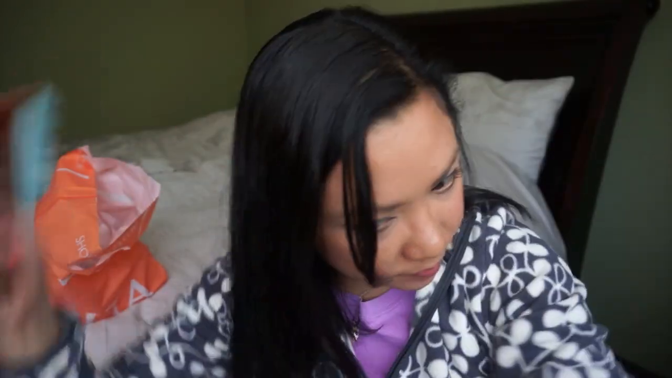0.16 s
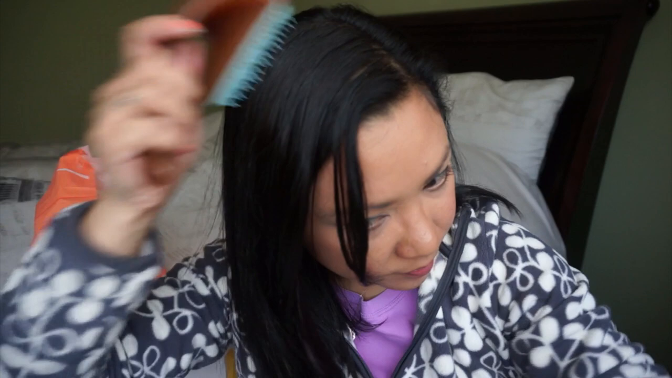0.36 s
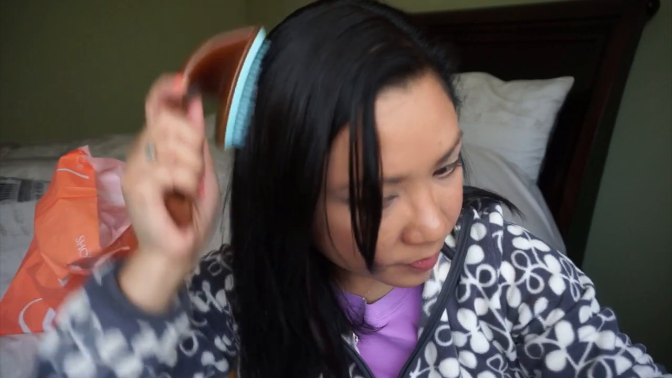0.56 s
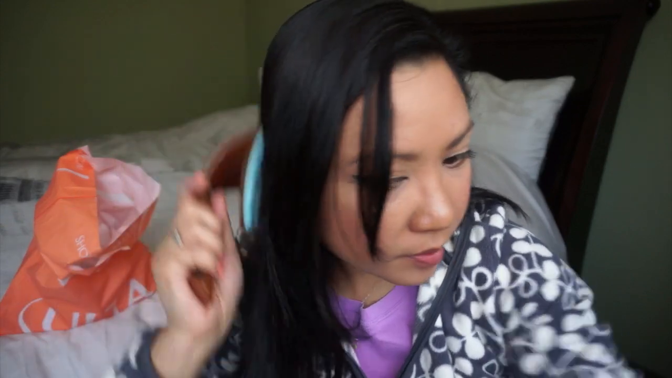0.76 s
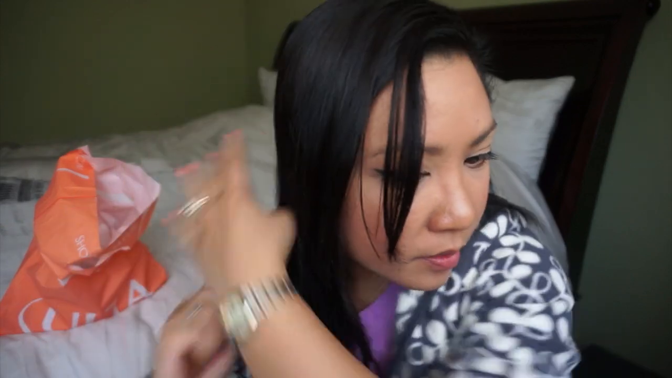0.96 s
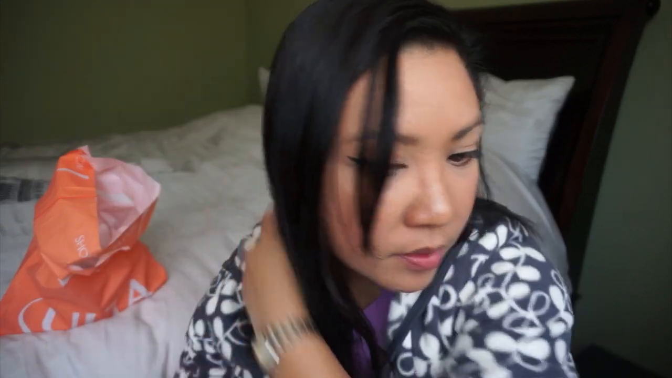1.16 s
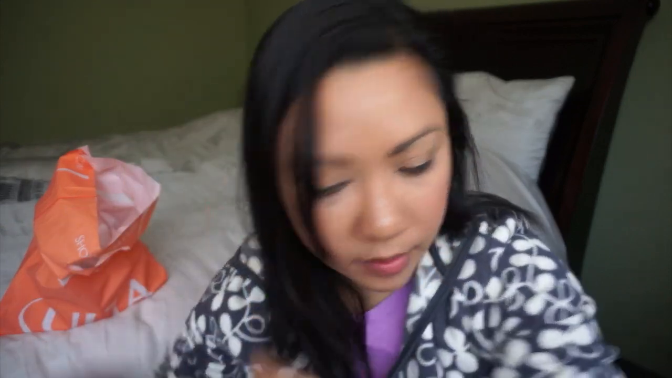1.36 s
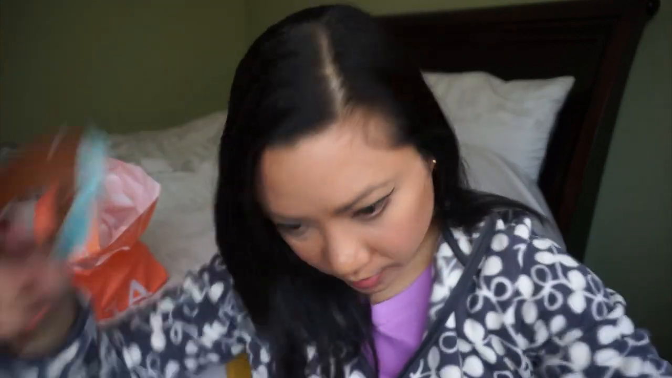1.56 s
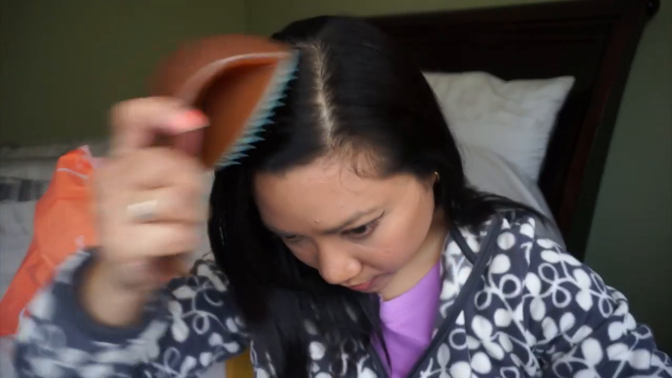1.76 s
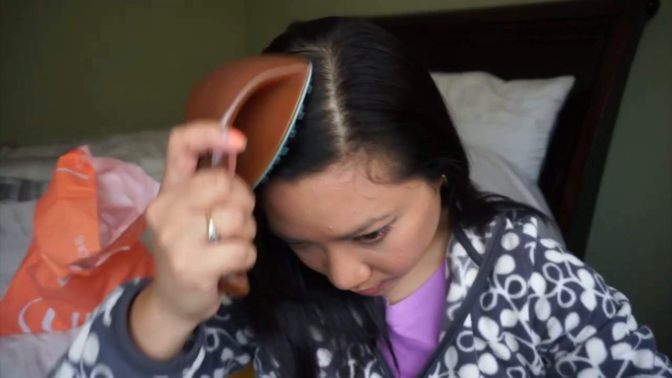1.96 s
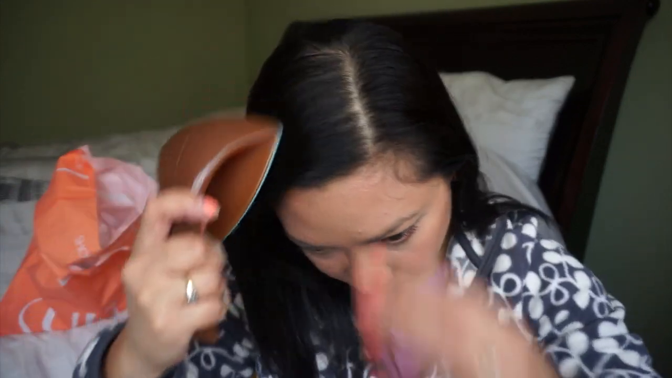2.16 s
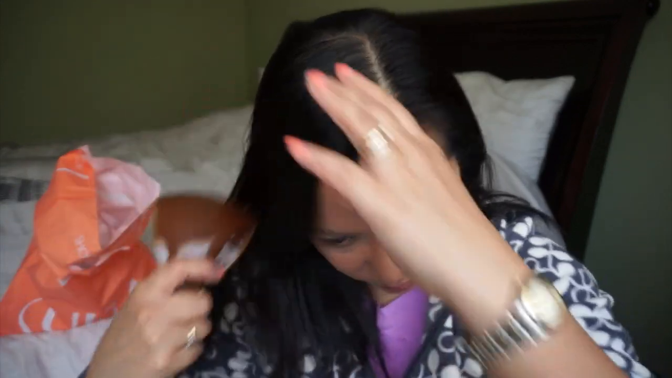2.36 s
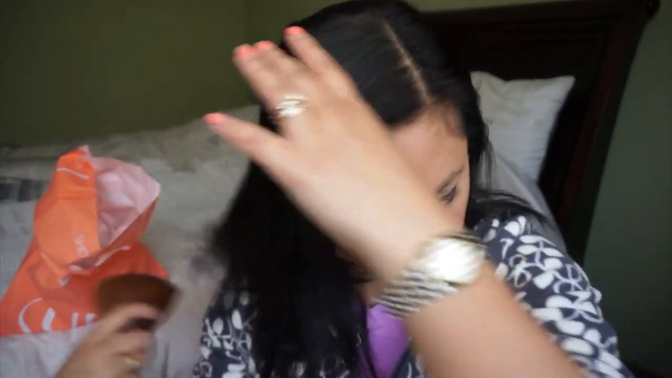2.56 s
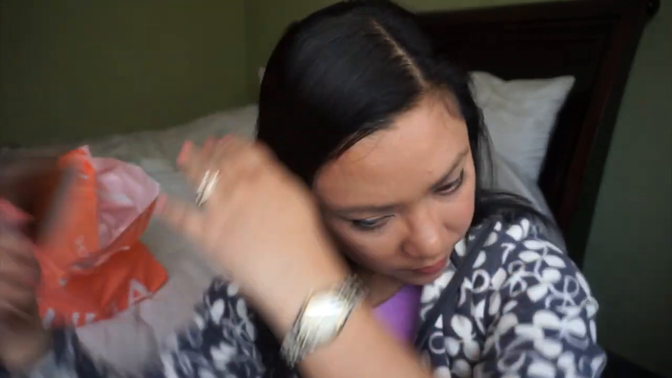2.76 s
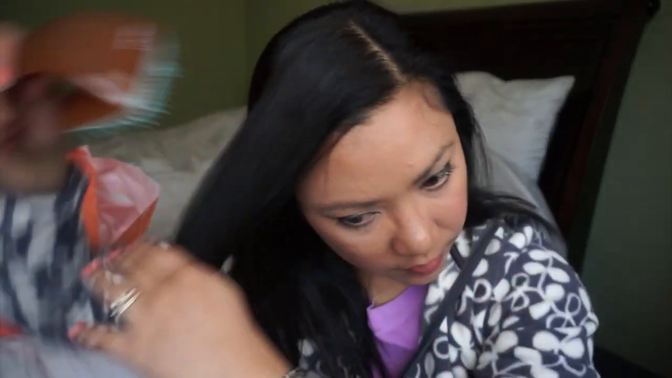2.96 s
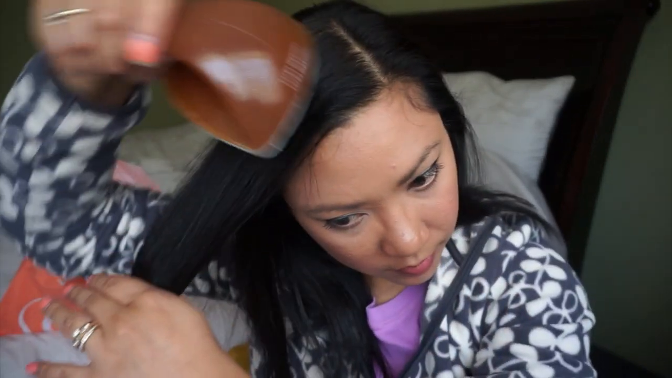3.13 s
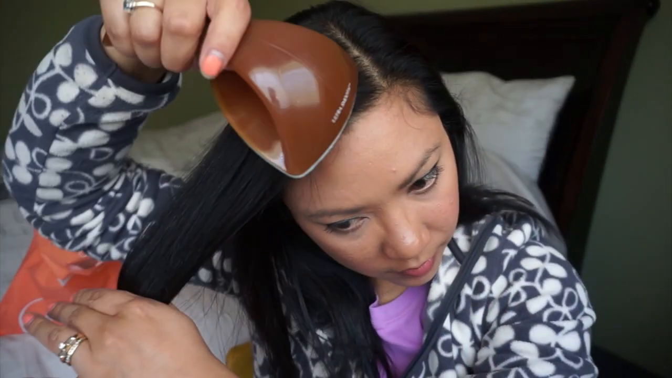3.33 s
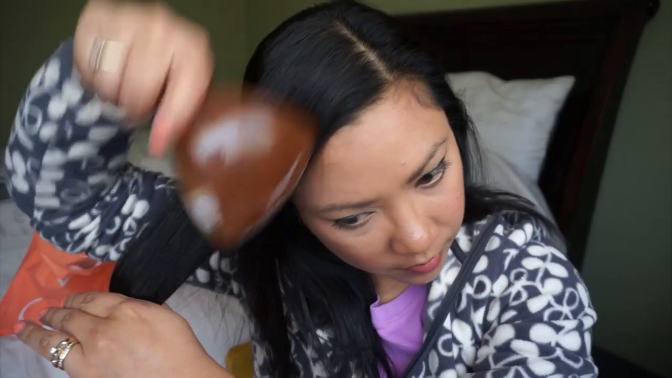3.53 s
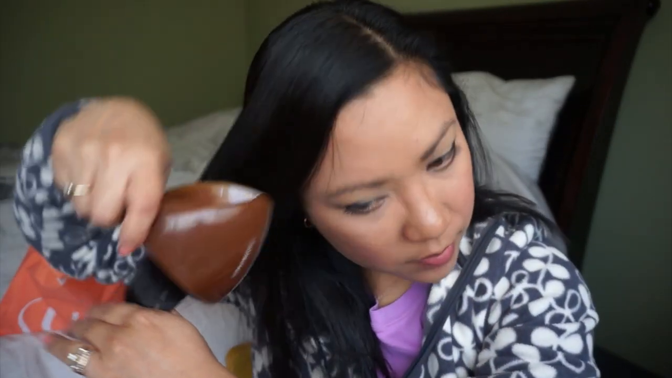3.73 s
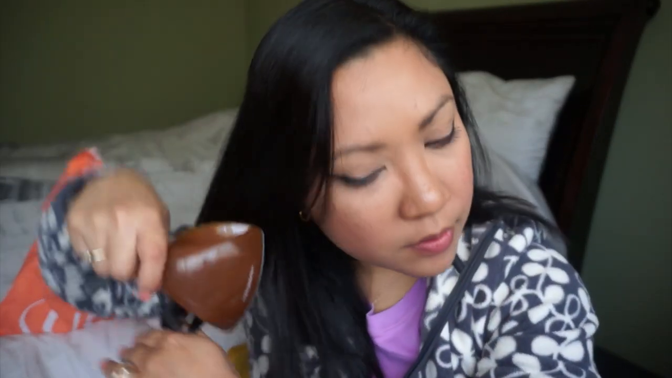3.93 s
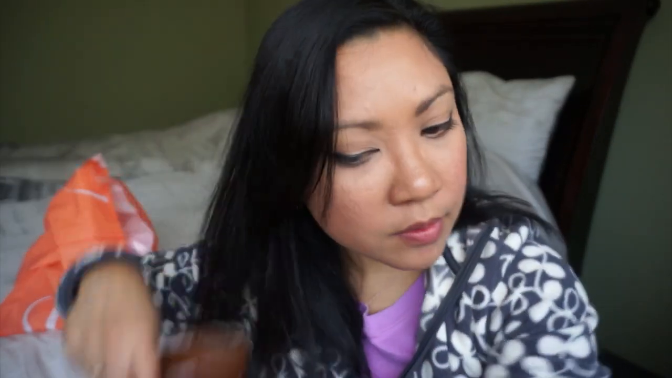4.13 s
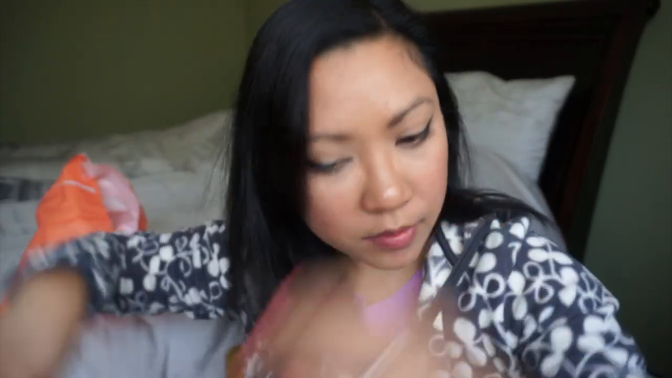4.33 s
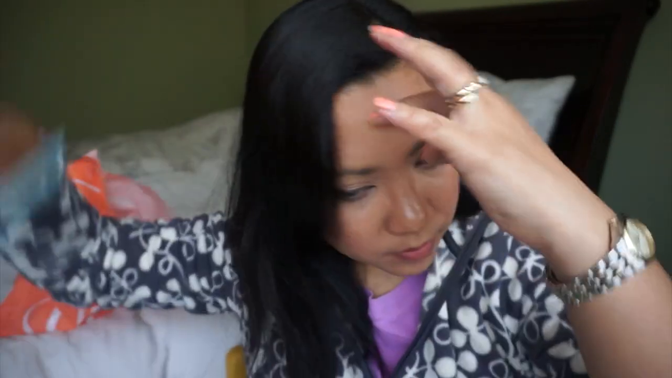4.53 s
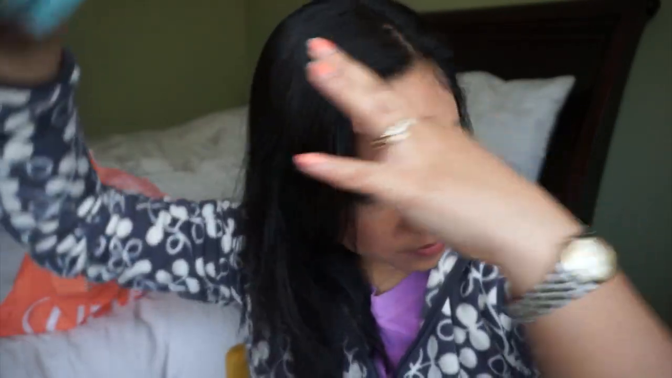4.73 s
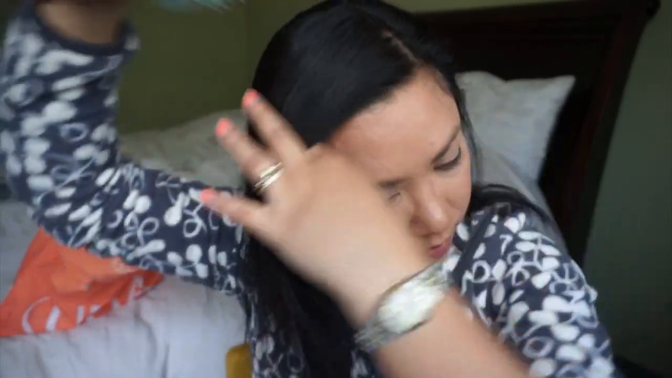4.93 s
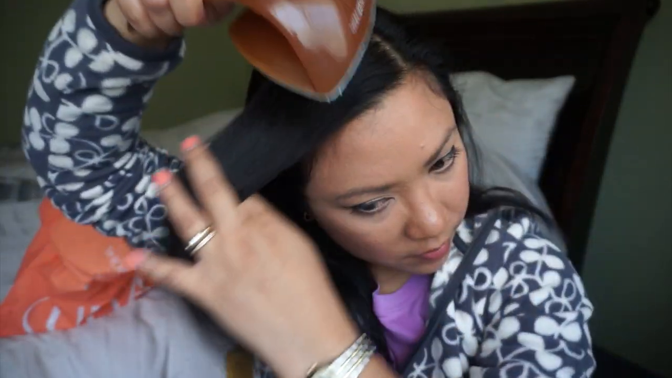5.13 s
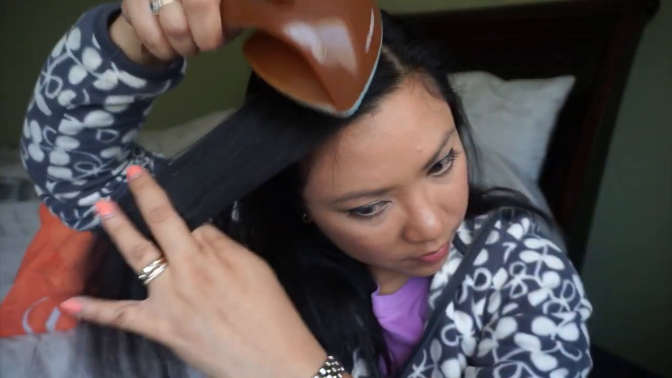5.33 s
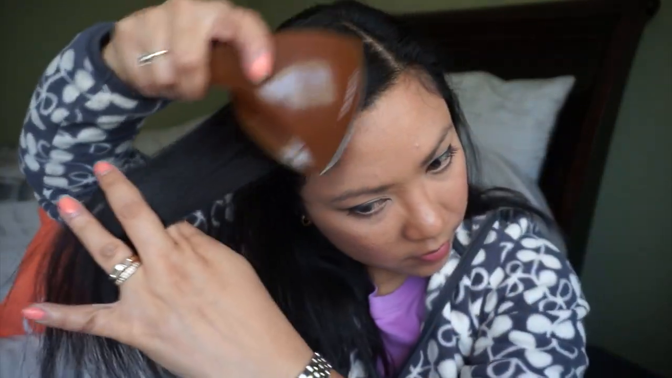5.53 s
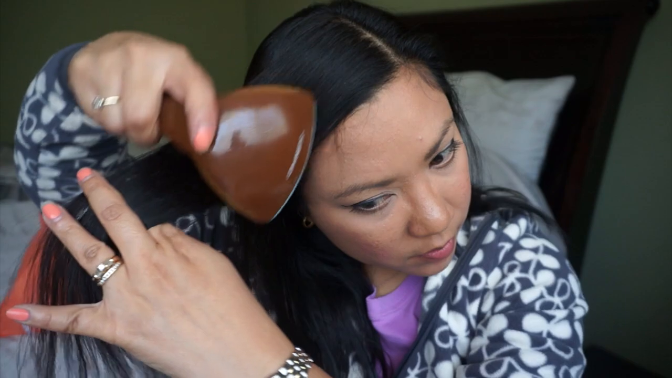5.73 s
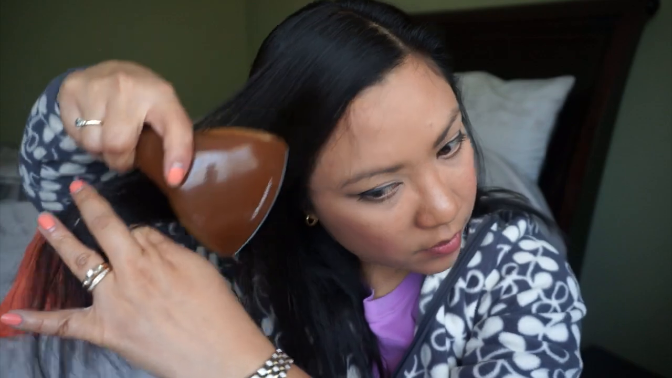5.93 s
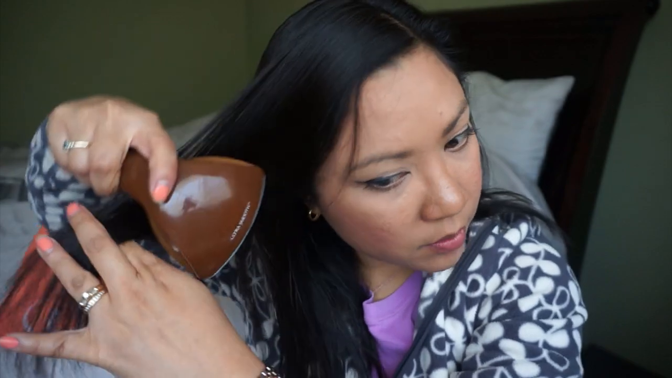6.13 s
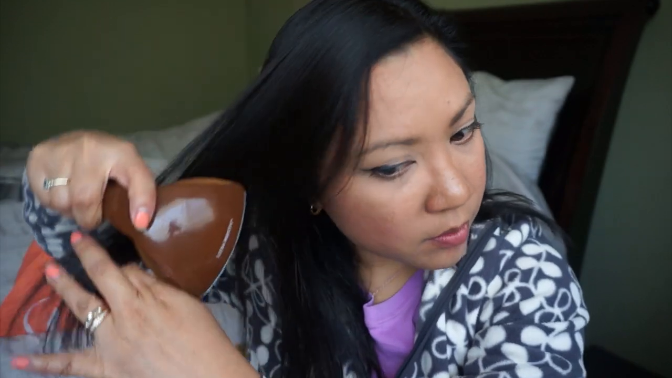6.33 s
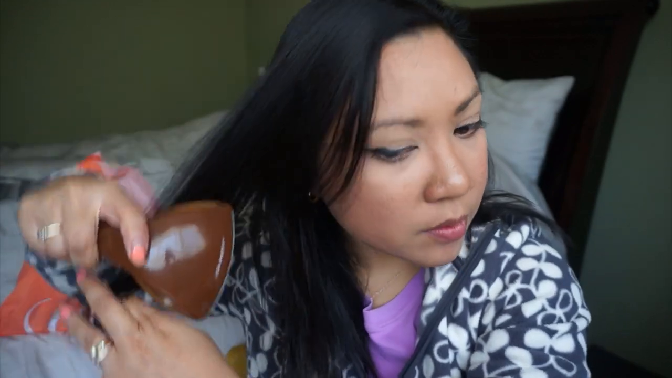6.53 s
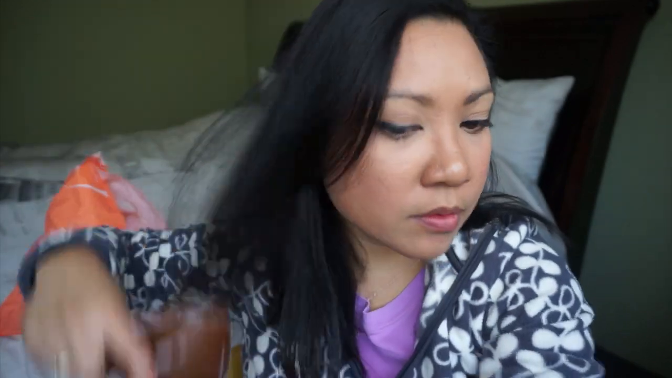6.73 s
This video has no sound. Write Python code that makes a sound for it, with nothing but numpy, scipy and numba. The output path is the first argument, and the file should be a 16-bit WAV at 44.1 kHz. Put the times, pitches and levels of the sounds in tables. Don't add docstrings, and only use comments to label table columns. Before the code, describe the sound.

A quiet bedroom with steady soft microphone hiss and a very short, damped echo. At about 0.4 s a brush lands with a small click, and a strong, grainy rasp of bristles through dry hair runs from 0.5 s, hollow and plasticky, weakening by 0.9 s into a few cupped thumps. At 1.12 s a knot snaps in a tight burst of loud clicks, followed by an airy swish fading out. A second, shorter stroke scrapes from 2.0 to 2.6 s, with ticks near 2.2 s. After faint rustles, a third begins around 3.5 s, lighter at first, swelling to loud cracks near 3.98 s and ending by 4.2 s with crisp clicks. Fingers rustle and tick softly from 4.2 to 4.8 s, with a faint low sleeve rub and then a hair swish. From 5.5 s a slow, softer, even pull continues to 6.85 s, finishing in small snaps and quiet.

```python
import sys
import numpy as np
from scipy import signal
from scipy.fft import rfft, irfft, next_fast_len
from scipy.io import wavfile
from scipy.ndimage import uniform_filter1d
from numba import njit

SR = 44100
rng = np.random.default_rng(int(sys.argv[2]) if len(sys.argv) > 2 else 0)


def to_wav(sig):
    pcm = np.clip(np.atleast_2d(sig), -1, 1) * 32767
    pcm = np.round(pcm).astype(np.int16)
    wavfile.write(sys.argv[1], SR, pcm.T)


def undo_db(level):
    steps = np.asarray(level, float) / 20
    return 10 ** steps


N = 303661

# mode_hz, width_hz, level_db
CUP_AIR = [(667, 111, -0.5), (470, 136, -2.5), (780, 140, -5)]
PAD_START_HZ = 992
JERK_THUMP_DB = 14


def level(x, db):
    return x * undo_db(db) / np.sqrt(np.mean(x ** 2))


def colour(x, points):
    hz, db = np.transpose(points)
    size = next_fast_len(len(x))
    log_hz = np.log(np.arange(1, size // 2 + 2) * SR / size)
    gain = undo_db(np.interp(log_hz, np.log(hz), db))
    return irfft(rfft(x, size) * gain, size)[:len(x)]


@njit
def svf(x, hz, width):
    y, band, low = np.empty(len(x)), 0., 0.
    for i in range(len(x)):
        g = np.tan(np.pi * hz[i] / SR)
        damping = width / hz[i]
        v = (band + g * (x[i] - low)) / (1 + g * (g + damping))
        band = 2 * v - band
        low = low + 2 * g * v
        y[i] = damping * v
    return y


def ring(x, modes):
    out = 0
    for k, (hz, width, db) in enumerate(modes):
        out = out + (-1) ** k * undo_db(db) * svf(x, np.full(N, 1. * hz), 1. * width)
    return out


def walk(rate):
    hold = int(SR / rate)
    return uniform_filter1d(np.repeat(rng.standard_normal(N // hold + 1), hold), hold)[:N]


def flicks(per_s, spread_db):
    chance, size, sign = rng.random(N), rng.exponential(size=N), rng.standard_normal(N)
    return (chance < per_s / SR) * sign * undo_db(spread_db * np.minimum(size, 4))


def brush(plate_db, cup_db, pad_db, hiss_db, pad_hz, back_hz, pan_db, grip_db):
    # mode_hz, width_hz, level_db
    shell_modes = [(1800, 520, 5), (3370, 2500, 1)]
    # freq_hz, density_db
    strand_colour = [(300, -43.5), (800, -6.5), (2000, -0.5), (4000, -2.5), (6000, -4), (11000, -6)]
    tufts = undo_db(1.06 * walk(80) + 0.83 * walk(20))
    rows = [tufts * level(flicks(per_s=6000, spread_db=1.0), 0) for _ in range(3)]

    open_mouth = undo_db(0.51 * np.clip(cup_db - pad_db, -8, 8))
    air = open_mouth * ring(rows[0], CUP_AIR[:1]) - ring(rows[0], CUP_AIR[1:])
    air = air / np.sqrt(1 + open_mouth ** 2)
    cup = ring(air, [(625, 690, 0)]) * undo_db(0.79 * walk(66))

    pad = svf(svf(rows[1], pad_hz, 200.), pad_hz, 1200.)
    pad = pad * undo_db(0.98 * walk(60))
    back = svf(rows[1], 1.035 * back_hz, 260.)
    back = back * undo_db(np.clip(1.4 * (-43 - plate_db), 0, 9))
    plate = ring(1.11 * undo_db(grip_db) * back + ring(rows[2], shell_modes), [(2300, 1740, 0)])
    plate = plate / np.sqrt(uniform_filter1d(plate ** 2, size=16384))

    slips = tufts ** 0.31 * level(flicks(per_s=14000, spread_db=1.0), 0)
    strands = colour(slips + 0.032 * rows[1], strand_colour)

    lean_db = 0.69 * np.array([pan_db, -pan_db]) / 2
    return (undo_db(plate_db - 0.47 + lean_db) * level(plate, 0)
            + undo_db(cup_db - 0.6) * level(cup, 0)
            + undo_db(pad_db + 0.11) * level(pad, 0)
            + undo_db(hiss_db + 2.5 + lean_db) * level(strands, 0))


def gestures():
    # time_s, drag_db, pad_seating_db, cup_mouth_opening_db, strand_slip_db
    pull_1 = [(.45, -55.5, -5, -9, -5), (.499, -37.5, -6.5, -7.5, -11), (.63, -40.5, -2, -3.5, -9),
              (.78, -42, 0, -12, -7), (.85, -45, -6.5, -2.5, -7.5), (.9, -49.5, -7.5, 2, -1),
              (1.0, -55.5, -3, 1, -2.5), (1.1, -54.5, -8, 8, -4), (1.16, -62.5, -10, 11, 0.5)]
    pull_2 = [(1.97, -60.5, -8, -2, -4), (2.02, -47.5, 1, 1.5, -11), (2.08, -42.5, -5, -3, -14),
              (2.19, -44, 3, -3.5, -9), (2.24, -41.5, -7, -17, -10), (2.28, -52.5, -4, -5, -1.8),
              (2.42, -49.5, -11, -2, -9), (2.54, -53, -6, 1.5, -4), (2.59, -64, -8, -4, 1.5)]
    pull_3 = [(3.467, -59, 1, -17, -5), (3.535, -50.5, 1.5, -15, -1.5), (3.6, -55.5, -1.5, -12, -1),
              (3.8, -51, -0.5, -4, -2.5), (3.84, -53.5, -1, -10, 5.5), (3.955, -46, -5.5, -7.5, 0.5),
              (4.0, -40.5, -7.5, -10, 1.5), (4.13, -45, -11, -6, 2.5), (4.19, -58, -4, -0.5, 9)]
    pull_4 = [(5.51, -60, -0.5, -6, -4), (5.58, -47.5, -1.5, -13.5, -7.5), (5.68, -50.5, 0.5, -8, -4),
              (5.8, -47.5, -4, -11.5, -3.5), (6.1, -50, -3, -13.5, -4), (6.45, -54.5, -6, -14, -3),
              (6.62, -51.5, -6, -13.5, -5), (6.7, -53, -7, -7, 1.5), (6.841, -50.5, -14, -13.5, 2.5)]
    fingers = [(4.21, -58.5, -5, -11, 3.5), (4.3, -58, -2.5, -5.5, 8.5), (4.4, -58.5, -3, -12, 5.5),
               (4.48, -54, -7, -14, 2.5), (4.61, -55, -5, -21, -2.5), (4.68, -64.5, -4.5, -14, 0),
               (4.76, -61.5, -6.5, -7.5, -0.5)]
    # left_minus_right_start_db, left_minus_right_end_db, shell_back_freedom_db
    sweeps = [
        (1.5, 0.8, -4),
        (0.6, 3.7, 2.5),
        (3.5, 2.5, -1.5),
        (0.6, 6.2, -0.5),
        (4, 2.5, -9),
    ]
    # start_s, hiss_db, fade_20db_s, body_over_hiss_db
    # (a negative fade swells up to start_s and stops short)
    grazes = [(.02, -62, 1, -3.5), (.425, -51.5, 0.05, 5.5), (1.14, -42, 0.12, -13),
              (1.24, -57.5, 0.67, -4), (1.908, -61, 0.14, 8.5), (1.952, -62, 0.07, 9.5),
              (2.66, -63, 0.5, -4.5), (2.84, -60, .7, -14), (4.845, -53, .12, -17), (4.72, -65, -0.3, -8),
              (4.95, -66.5, 1.1, -5.5), (5.474, -60.5, -0.03, 9.5)]
    land_db_per_s, lift_db_per_s = 500, 168
    pad_loaded_hz, pad_load_s = 1190, 0.33
    graze_rise = 0.18
    graze_cup_db, graze_pad_db = -6.5, -4
    back_centre_hz, back_wander = 2350, 0.027

    t = np.arange(N) / SR
    power, weight, load, pan_db, grip_db = 1e-12, 1e-12, 0, 0, 0
    for pull, (*sweep_db, free_db) in zip((pull_1, pull_2, pull_3, pull_4, fingers), sweeps):
        s, drag_db, seat_db, mouth_db, slip_db = np.transpose(pull)
        drag = np.interp(t, s, drag_db)
        drag = drag - land_db_per_s * np.maximum(s[0] - t, 0)
        drag = drag - lift_db_per_s * np.maximum(t - s[-1], 0)
        shares = [0 * t] + [np.interp(t, s, db) for db in (mouth_db, seat_db, slip_db)]
        power = power + undo_db(drag + np.array(shares)) ** 2
        weight = weight + undo_db(drag)
        grip_db = grip_db + undo_db(drag) * free_db
        unloaded = np.exp(-np.maximum(t - s[0], 0) / pad_load_s) * (pull is not fingers)
        load = load + undo_db(drag) * unloaded
        pan_db = pan_db + undo_db(drag) * np.interp(t, s[[0, -1]], sweep_db)
    for s, db, fade_s, body_db in grazes:
        touch_db = db - 20 * np.maximum((t - s) / fade_s, (s - t) / (graze_rise * fade_s))
        shares = np.array([[body_db], [body_db + graze_cup_db], [body_db + graze_pad_db], [0]])
        power = power + undo_db(touch_db + shares) ** 2
    plate_db, cup_db, pad_db, hiss_db = 10 * np.log10(power)
    pad_hz = pad_loaded_hz + (PAD_START_HZ - pad_loaded_hz) * load / weight
    back_hz = back_centre_hz * (1 + back_wander * walk(6))
    return plate_db, cup_db, pad_db, hiss_db, pad_hz, back_hz, pan_db / weight, grip_db / weight


def snags():
    size = 4096
    out, t = np.zeros((2, N + size)), np.arange(size) / SR
    rows = snag_rows()
    cracks = rng.standard_normal((len(rows), 2, size))
    for (s, peak_db, hz, crack_db, thump_db, pan_db), (high, broad) in zip(rows, cracks):
        shell = np.sin(2 * np.pi * hz * t) * np.exp(-t * hz / 2.7) * (1 - np.exp(-t / 0.00036))
        rattle = svf(broad, np.full(size, 0.8 * hz), 1.24 * hz)
        rattle = 2.74 * svf(rattle, np.full(size, 1.1 * hz), 1.44 * hz)
        rattle = rattle * (np.exp(-t / 0.0024) + 0.074 * np.exp(-t / 0.012))
        crack = np.diff(high, prepend=0) * (np.exp(-t / 0.00072) + 0.2 * np.exp(-t / 0.024))
        thump = np.sin(2 * np.pi * CUP_AIR[0][0] * t) * np.exp(-t / 0.0053) * (1 - np.exp(-t / 0.0019))
        snap = 1.05 * shell + 0.44 * rattle + 1.01 * undo_db(crack_db) * crack + 1.4 * undo_db(thump_db) * thump
        i = int((s + 0.0012) * SR)
        out[:, i:i + size] += undo_db(peak_db) * snap * undo_db(np.array([[pan_db], [-pan_db]]) / 2)
    return signal.sosfilt(signal.butter(3, 420, "high", fs=SR, output="sos"), out[:, :N])


def snag_rows():
    # start_s, peak_db, ring_hz, crack_over_peak_db, left_minus_right_db
    snaps = [(.408, -44, 1880, -2, -2.5), (0.419, -28.5, 2120, -15, 2.5), (1.118, -25.5, 3030, -21, 5),
             (1.124, -18, 2000, -6, 1.5), (1.13, -17.5, 2730, -14, 3), (1.137, -24, 2550, -7, 0),
             (3.503, -41, 2800, -8, .5), (3.536, -30, 1115, -14, -5), (3.549, -37, 3500, -4, 2.5),
             (3.973, -15, 2010, -10, 4.5), (3.981, -24, 4250, -13, -10), (3.991, -20, 2120, -11, 3),
             (4.057, -26, 2200, -5, 7), (4.111, -26, 3220, 3, 4), (4.118, -27.5, 2500, 2, -5),
             (4.283, -30, 4030, -8, 8.5), (4.29, -36, 4500, -8, -5), (4.718, -38.5, 1520, -16, 3),
             (4.829, -38.5, 2700, -3, 9), (4.835, -37.5, 2950, -5, -9), (5.472, -36.5, 1720, -14, .3),
             (6.809, -25.5, 2460, -3, 5), (6.814, -25.5, 2750, -3, -6), (6.818, -30, 3260, -19, 3)]
    # start_s, peak_db, ring_hz
    ticks = [(.719, -32, 1260), (.82, -28.5, 1410), (1.069, -37.5, 2200), (1.076, -40, 1100),
             (1.332, -42, 1600), (1.902, -41, 2620), (1.91, -39, 2300), (1.345, -42.5, 2400),
             (2.196, -24.5, 1840), (2.22, -26.5, 986), (2.416, -36, 2420), (2.44, -39, 2470),
             (3.299, -46, 1020), (3.466, -46, 1100), (3.492, -30, 1014), (3.522, -30.5, 960),
             (3.53, -31, 2500), (3.548, -30, 1130), (4.247, -41, 1700), (4.349, -37.5, 1240),
             (4.426, -36, 1190), (4.436, -44, 1210), (4.477, -35, 1500), (4.514, -38, 1900),
             (4.541, -36, 2140), (4.586, -38, 1520), (5.475, -38, 1070), (5.577, -37.5, 920),
             (5.815, -31.5, 2420), (6.07, -34.5, 1150)]
    # start_s, peak_db
    thumps = [(.413, -40), (.934, -32), (.959, -26), (1.069, -39), (1.118, -27), (1.124, -30.5),
              (1.139, -29), (1.149, -35), (1.161, -39), (1.91, -42), (2.024, -41), (2.196, -39),
              (2.47, -42), (2.5, -37), (2.516, -35), (4.057, -40)]
    tick_crack_db, tick_scatter_db, knot_thump_db = -26, 4, -31
    rows = [(s, db, hz, crack_db, knot_thump_db, pan_db) for s, db, hz, crack_db, pan_db in snaps]
    sides = tick_scatter_db * rng.standard_normal(len(ticks))
    for (s, db, hz), pan_db in zip(ticks, sides):
        rows.append((s, db, hz, tick_crack_db, knot_thump_db, pan_db))
    for s, db in thumps:
        rows.append((s, db - JERK_THUMP_DB, PAD_START_HZ, tick_crack_db, JERK_THUMP_DB, 0))
    return rows


def sleeve():
    middle_s, length_s, rub_db, rub_hz = 4.54, 0.24, -73, 300
    t = np.arange(N) / SR
    rub = ring(rng.standard_normal(N), [(rub_hz, 220, 0)])
    rub = ring(rub, [(rub_hz, 260, 0)]) * undo_db(2.3 * walk(30))
    return level(rub, rub_db) * np.exp(-((t - middle_s) / length_s) ** 2)


def bumps():
    # middle_s, peak_db
    jolts = [
        (.423, -60),
        (1.127, -52),
        (1.143, -62),
        (3.974, -61.5),
    ]
    t = np.arange(N) / SR
    out = 0
    for s, db in jolts:
        out = out + undo_db(db) * np.sin(2 * np.pi * 160 * (t - s)) * np.exp(-((t - s) / 0.0026) ** 2)
    return out


def room(x):
    # freq_hz, level_db
    echo_colour = [(200, 6), (700, 1), (2500, -1), (6000, -0.5), (11000, 0)]
    t60_s, tail_db, alike = 0.2, -10.5, 0.45
    t = np.arange(int(0.6 * SR)) / SR
    mid, side = (colour(rng.standard_normal(len(t)), echo_colour) for _ in range(2))
    tail = np.sqrt(1 + alike) * mid + np.sqrt(1 - alike) * side * np.array([[1], [-1]])
    tail = tail * undo_db(-60 * t / t60_s) * np.clip((t - 0.004) / 0.0076, 0, 1)
    tail *= undo_db(tail_db) / np.sqrt(np.sum(tail ** 2) / 2)
    return signal.fftconvolve(x[None], tail, axes=1)[:, :N]


def hiss():
    # freq_hz, density_db
    floor_colour = [(15, -67), (25, -36), (210, -10), (478, -7), (760, -3.7), (1980, -2.5), (2900, -4.5),
                    (10900, -6)]
    # freq_hz, side_minus_mid_db
    floor_width = [(60, -20), (200, -9), (500, 0.5), (1100, 0.5), (2000, -3), (4000, -9.5)]
    mid, side = (colour(rng.standard_normal(N), floor_colour) for _ in range(2))
    gain = undo_db(-61 + 2.0) / np.std(mid)
    return gain * (mid + colour(side, floor_width) * np.array([[1], [-1]]))


def narrow(x):
    # edge_hz, needed_db
    width_edges = [(3900, -67), (4700, -58), (5600, -52.5), (7000, -39.5), (8300, -38.5), (9600, -13),
                   (10300, -48.5), (11100, 0)]
    mid, side = (x[0] + x[1]) / 2, (x[0] - x[1]) / 2
    slow_power = uniform_filter1d(mid ** 2, size=8192)
    loud_db = 10 * np.log10(slow_power + 1e-12)
    burst = uniform_filter1d(mid ** 2, size=1024) > 2.5 * slow_power
    below = [colour(side, [(hz, 0), (hz * 1.02, -80)]) for hz, _ in width_edges]
    kept = below[0]
    for low, high, (_, db) in zip(below, below[1:], width_edges):
        spare_db = loud_db - db + 9.1 * walk(14)
        kept = kept + np.maximum(0.31 * burst, np.clip(spare_db, 0, 1)) * (high - low)
    return np.array([mid + kept, mid - kept])


def scene():
    near = brush(*gestures()) + snags() + sleeve()
    near = signal.sosfilt(signal.butter(2, 92, "high", fs=SR, output="sos"), near)
    return near + room(near.mean(axis=0)) + hiss() + bumps()


def top_cut(x):
    return signal.sosfilt(signal.butter(12, 12320, fs=SR, output="sos"), x)


def record(dry):
    low_pass = signal.ellip(12, 0.2, 80, 11050, fs=SR, output="sos")
    return top_cut(signal.sosfilt(low_pass, narrow(dry)))


dry = scene()
out = record(dry)
to_wav(out)
```